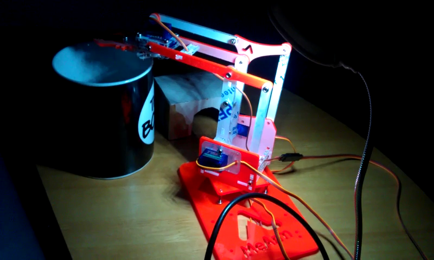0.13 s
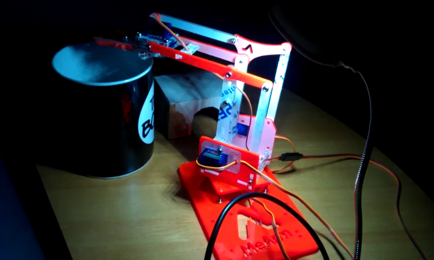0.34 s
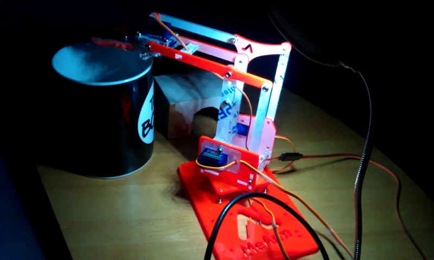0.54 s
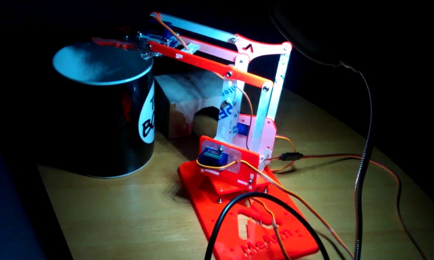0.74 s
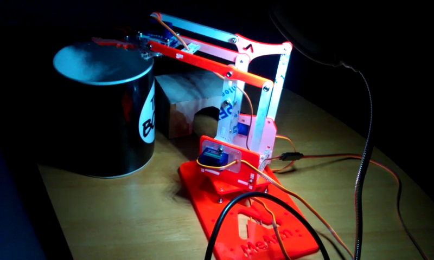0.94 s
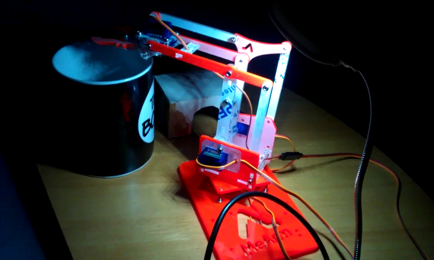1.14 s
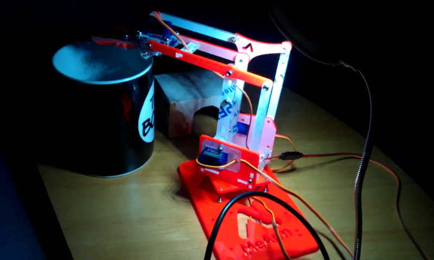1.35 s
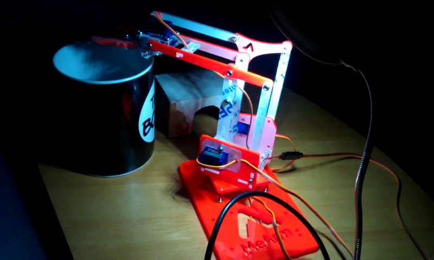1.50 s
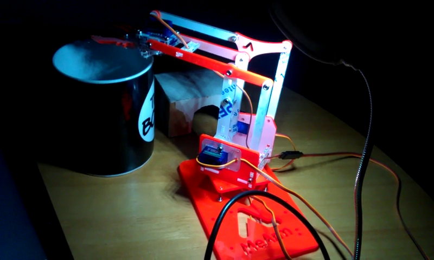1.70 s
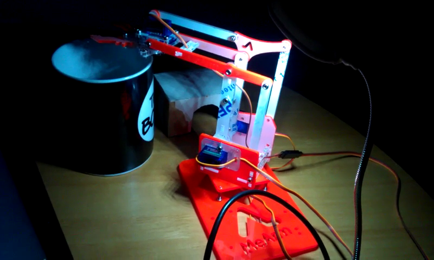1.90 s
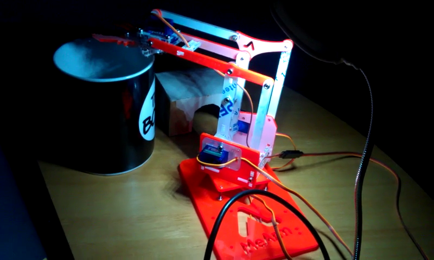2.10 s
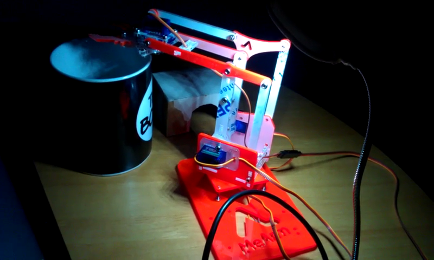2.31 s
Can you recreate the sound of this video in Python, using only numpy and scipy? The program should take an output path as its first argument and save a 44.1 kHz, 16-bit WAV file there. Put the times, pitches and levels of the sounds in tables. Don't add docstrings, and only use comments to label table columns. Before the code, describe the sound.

Piercing metallic ring and quick knocks inside a ceramic mug, dying away within half a second, followed by the rapid dry ticking of little motors and quiet hiss, close up in a small quiet room, left side louder.

```python
import sys
import numpy as np
from scipy import signal
from scipy.fft import rfft, irfft, next_fast_len
from scipy.io import wavfile

SR = 44100
rng = np.random.default_rng(int(sys.argv[2]) if len(sys.argv) > 2 else 0)


def voltage_ratio(decibels):
    exponent = np.asarray(decibels, float) / 20
    return 10 ** exponent


def bounce(signal):
    frames = np.transpose(np.atleast_2d(signal))
    limited = np.clip(frames, -1, 1)
    pcm = np.round(limited * 32767).astype(np.int16)
    wavfile.write(sys.argv[1], SR, pcm)


N = 103635


def in_time(rows):
    s, *columns = np.transpose(rows)
    return [np.interp(np.arange(N) / SR, s, c) for c in columns]


def ring(clicks, hz, t60):
    shrink, turn = voltage_ratio(-60 / (t60 * SR)), 2 * np.pi * hz / SR
    return signal.lfilter([0, np.sin(turn)], [1, -2 * shrink * np.cos(turn), shrink * shrink], clicks + 1e-18)


def fading(clicks, fade_s):
    return signal.lfilter([1], [1, -np.exp(-1 / (fade_s * SR))], clicks + 1e-18)


def band(x, low_hz, high_hz, order=2):
    return signal.sosfilt(signal.butter(order, [low_hz, high_hz], "band", fs=SR, output="sos"), x)


def sides(right_db):
    return voltage_ratio(np.array([[0], [right_db]]))


# (time [s], left level [dB], right level [dB])
FACING = [
    (.188, -40.5, -48.5),
    (.2, -8.5, -21.5),
    (.2045, 0.96, -15),
    (.215, 1.6, 0.25),
    (.232, 1.14, 1.2),
    (.241, 0, 0),
    (.25, -15, -5),
    (.262, -14.5, -16.5),
    (.45, -53.5, -54.5),
]


def ringing_face():
    face_hz, twin_hz, twin_db = 6345, 6326, -18
    upper_hz, upper_db, upper_stops_s = 7636, -26, 0.26
    wobble_db, wobble_hz = -17.5, 150
    t = np.arange(N) / SR
    turn = 2 * np.pi * t + np.array([[0], [3e-5]])
    upper_level = voltage_ratio(upper_db - 2500.0 * np.maximum(t - upper_stops_s, 0))
    tones = np.sin(face_hz * turn) + voltage_ratio(twin_db) * np.sin(twin_hz * turn)
    tones += upper_level * np.sin(upper_hz * turn)
    wobble = band(rng.standard_normal((2, N)), face_hz - wobble_hz, face_hz + wobble_hz)
    tones += voltage_ratio(wobble_db) * wobble / wobble.std() * np.where(t > upper_stops_s, 3.0, .5)
    start, end = FACING[0][0], FACING[-1][0]
    level_db = np.array(in_time(FACING)) - 200.0 * np.maximum(t - end, 0)
    return tones * voltage_ratio(level_db) * (t > start)


# (time [s], metal level [dB], mug level [dB], thud level [dB], crack level [dB])
CONTACTS = [(.1891, -22, -43, -32, -16.5), (.1957, -14.5, -35.5, -34, -13.5),
            (.198, -20.5, -37, -36.5, -5.5), (.2036, -17.5, -41.5, -33, -9.5), (.223, -18, -39, -39, -17),
            (0.235, -23, -31.5, -42.5, -18.5), (0.2421, -19.5, -27, -41.5, -20),
            (0.2521, -30, -27.5, -35.5, -18), (0.262, -31, -29.5, -35, -26), (.279, -34, -38, -40, -29),
            (.33, -47.5, -53, -61, -47)]


def struck(modes, column, spread_db):
    rows, out = np.array(CONTACTS), np.zeros((2, N))
    at = (rows[:, 0] * SR).astype(int)
    luck_db = spread_db * rng.standard_normal((len(rows), len(modes)))
    for k, (hz, db, t60, right_db) in enumerate(modes):
        clicks = np.zeros(N)
        clicks[at] = voltage_ratio(rows[:, column] + db + luck_db[:, k])
        tone = ring(clicks, hz, t60)
        later = 1 + 3 * k % 7
        out += [tone, voltage_ratio(right_db) * np.roll(tone, later)]
    return out


# (pitch [Hz], level [dB], 60 dB fade [s], right level [dB])
METAL = [(5066, 0.5, 0.26, -7), (5085, -12.5, 0.17, -5), (5783, -12.5, .15, 9), (6067, -4, .1, -7.5),
         (6490, -12.5, .15, -7), (6800, -5, .22, -9.5), (8048, -24, .2, -6), (8220, -21.5, 0.3, -9),
         (8568, -12.5, .19, -6), (11115, -11, 0.1389, -2.5), (13600, -22.5, .1, -3.5),
         (10100, -22.5, 0.11, -6), (12200, -21, .06, -4)]


def metal_piece():
    return struck(METAL, column=1, spread_db=4.0)


# (pitch [Hz], level [dB], 60 dB fade [s], right level [dB])
MUG = [
    (2567, 2, 0.42, -5),
    (2657.7, -3, .41, -3),
    (2465, -10, .2, -4),
    (3838, -3.5, .35, -6),
    (1546, -11.5, .08, -3),
]


def mug():
    return band(struck(MUG, column=2, spread_db=1.5), 1000, 5000)


# (pitch [Hz], level [dB], 60 dB fade [s], right level [dB])
THUD = [
    (215, -14, 0.29, -13),
    (318, -0.5, 0.1097, -12.5),
    (450, -8, 0.0601, -10.5),
    (635, -3.5, 0.08, -11.5),
    (708, -1.5, 0.11, -12),
    (790, -2.5, 0.086, -10),
    (1080, -4.5, 0.052, -6.5),
    (2000, -3, 0.076, -5.5),
]


def thud():
    return band(struck(THUD, column=3, spread_db=5.0), 170, 2500)


def cracks():
    clicks = np.zeros(N)
    for s, *_, crack_db in CONTACTS:
        clicks[int(s * SR)] = voltage_ratio(crack_db)
    burst = fading(clicks, 0.002) * rng.standard_normal((2, N))
    return band(burst, 3000, 8500) * sides(-17.5)


# (low limit [Hz], high limit [Hz], level [dB], 60 dB fade [s])
SCATTER = [
    (150, 320, -17, .6),
    (300, 1090, -19.5, 0.48),
    (900, 2400, -14, 0.67),
    (2398, 5000, -12, 0.51),
    (5000, 9600, -5.5, 0.27),
    (7500, 9493, -20.5, 0.26),
]


def scatter():
    power, out = np.zeros(N), 0
    for s, _, _, thud_db, _ in CONTACTS:
        power[int(s * SR)] = voltage_ratio(2 * thud_db)
    rise = np.exp(-1 / (0.0039 * SR))
    power = signal.lfilter([1 - rise], [1, -rise], power + 1e-18)
    for low_hz, high_hz, db, t60 in SCATTER:
        shape = np.sqrt(signal.lfilter([1], [1, -voltage_ratio(-120 / (t60 * SR))], power))
        noise = band(rng.standard_normal((2, N)), low_hz, high_hz)
        out = out + voltage_ratio(db) * shape * noise / noise.std()
    return out * sides(-8)


# (time [s], level [dB])
EFFORT = [
    (0, -35),
    (.18, -38),
    (.26, -23.5),
    (.36, -23),
    (.45, -28),
    (.6, -37),
    (.8, -40),
    (1.2, -41.5),
    (2.35, -40.5),
]
# (delay [s], level [dB], right level [dB])
PULSE = [
    (0, -9.5, -11),
    (.0006, 0, -11),
    (.0026, -3, -11.5),
    (.0032, -0.5, -9.5),
    (.0102, -14, -5.5),
    (.0128, -19, -4.5),
]
# (pulse number [count], extra level [dB])
KICKS = [(2, 6), (4, 4), (6, 8), (8, 6), (29, 3), (31, 3), (35, 3), (49, 9), (51, 4), (55, 8), (57, 5),
         (59, 8), (61, 5), (63, 9), (65, 4), (67, 9), (69, 5), (71, 7), (78, 4), (84, 3), (86, 9), (88, 3),
         (90, 6), (102, 4), (104, 9), (106, 5), (108, 9), (110, 2), (112, 5), (113, 4)]
# (pitch [Hz], level [dB], 60 dB fade [s])
CASE = [(2950, -4.5, .008), (3420, -2, .008), (4090, -3, .006), (4470, -6, .008), (4790, -2, .008),
        (5600, -5, 0.0051), (6060, -5, 0.00598), (6680, -1.5, .006), (7070, -5.5, 0.0063)]


def servo():
    period_s, first_s, jitter_db, kick_gain = .02, .0121, 2, 1.3
    trim_db, rattle_db, rattle_s = -11, -18.5, 0.0024
    count = int((N / SR - .028) / period_s)
    extra_db = jitter_db * rng.standard_normal((count, len(PULSE)))
    kick_share = np.where(np.arange(len(PULSE)) < 2, .5, kick_gain)
    for number, db in KICKS:
        extra_db[round(number)] += db * kick_share
    clicks = np.zeros((2, N))
    for k, (delay, db, right_db) in enumerate(PULSE):
        at = np.round((first_s + delay + period_s * np.arange(count)) * SR).astype(int)
        clicks[:, at] += voltage_ratio(db + extra_db[:, k]) * sides(right_db) * (-1) ** k
    clicks *= voltage_ratio(in_time(EFFORT)[0] + trim_db)
    rattle = fading(np.abs(clicks), rattle_s) * rng.standard_normal((2, N))
    drive = clicks + voltage_ratio(rattle_db) * rattle
    case = np.zeros((2, N))
    for k, (hz, db, t60) in enumerate(CASE):
        case += (-1) ** k * voltage_ratio(db) * ring(drive, hz, t60)
    return band(case, 2583, 7450, order=4)


def room(x):
    t60_s, cut_hz, level_db, right_db = 0.36, 5400, -18.5, -9.5
    size = next_fast_len(N + SR)
    hz, out = np.arange(size // 2 + 1) * SR / size, np.zeros((2, N))
    spectrum = rfft(x, size)
    for k, lag in enumerate(rng.uniform(.006, .035, 20)):
        dulling = 1 + 1j * hz / cut_hz * lag * 10
        loop = voltage_ratio(-60 * lag / t60_s) / dulling * np.exp(-2j * np.pi * hz * lag)
        echoes = irfft(spectrum * loop / (1 - loop), size)[:N]
        out[k % 2] += echoes * (-1) ** (k // 2)
    return out * voltage_ratio(level_db) * sides(right_db)


# (pitch [Hz], level [dB per Hz])
HISS = [
    (30, -30),
    (70, -22),
    (220, -9.5),
    (2300, -7),
    (3400, -5.5),
    (6900, -3.5),
    (7700, -14.5),
    (11000, -23.5),
    (13000, -46),
]


def hiss():
    level_db, right_db, alike = -60.5, -8, .4
    hz, points = np.arange(N // 2 + 1) * SR / N + 1, np.array(HISS)
    colour = voltage_ratio(np.interp(np.log(hz), np.log(points[:, 0]), points[:, 1]))
    left, other = irfft(rfft(rng.standard_normal((2, N))) * colour, N)
    right = alike * left + np.sqrt(1 - alike ** 2) * other
    return voltage_ratio(level_db) / left.std() * np.array([left, voltage_ratio(right_db) * right])


# (time [s], pitch [Hz], level [dB])
MOAN = [
    (1.0, 290, -95.5),
    (1.18, 300, -80.5),
    (1.3, 305.2, -85.5),
    (1.42, 284.3, -78),
    (1.5, 261.4, -71),
    (1.58, 295, -79.5),
    (1.65, 300, -100),
]


def moan():
    hz, db = in_time(MOAN)
    return voltage_ratio(db) * np.sin(2 * np.pi * np.cumsum(hz) / SR) * np.array([[1], [.5]])


def scene():
    drop = band(metal_piece() + cracks() + mug() + thud(), 170, 13700)
    ticks = servo()
    echoes = room(drop[0] + 1.2 * ticks[0])
    return ringing_face() + drop + scatter() + ticks + echoes + hiss() + moan()


def low_pass(x):
    return signal.sosfilt(signal.butter(12, 20000, fs=SR, output="sos"), x)


def record(dry):
    mix = np.clip(dry, -1, 1)
    return low_pass(mix)


dry = scene()
out = record(dry)
bounce(out)
```